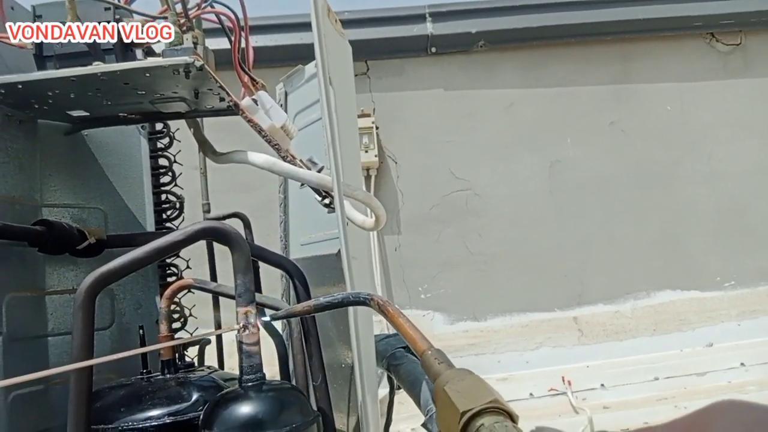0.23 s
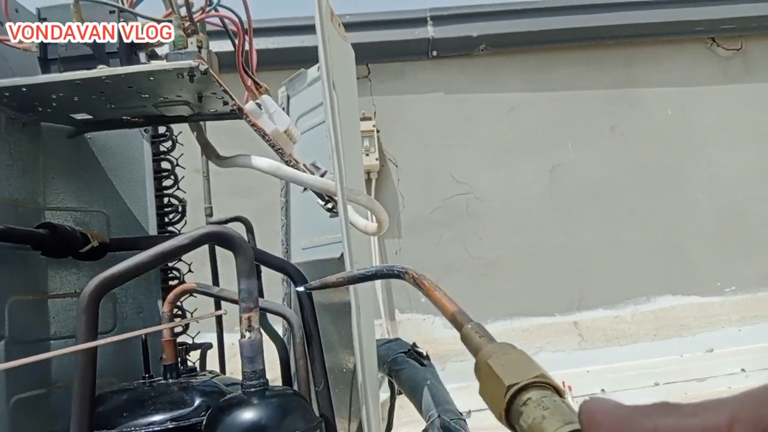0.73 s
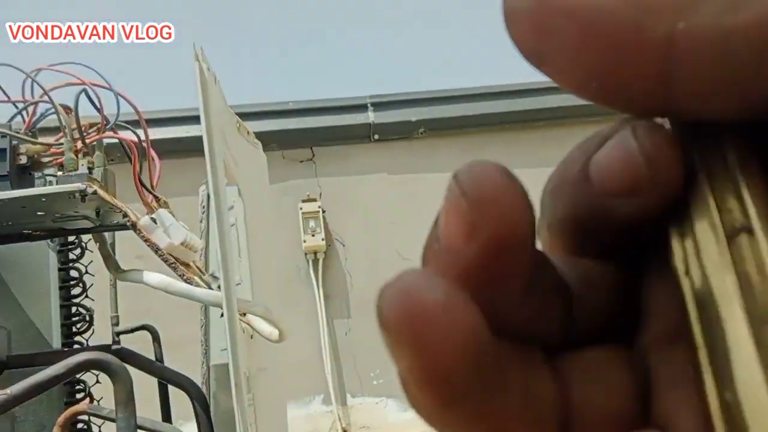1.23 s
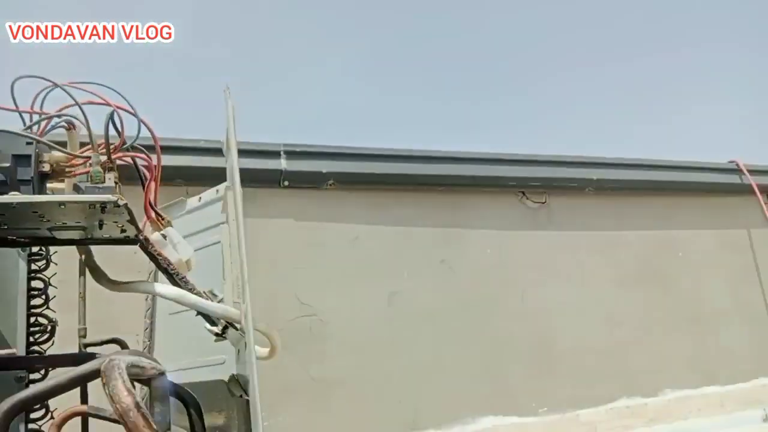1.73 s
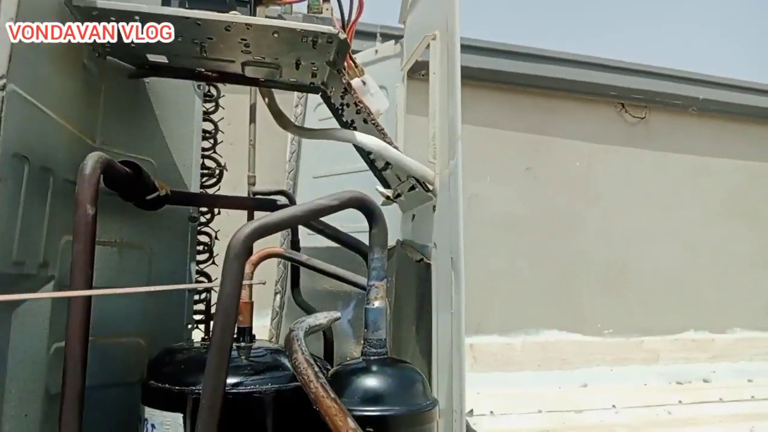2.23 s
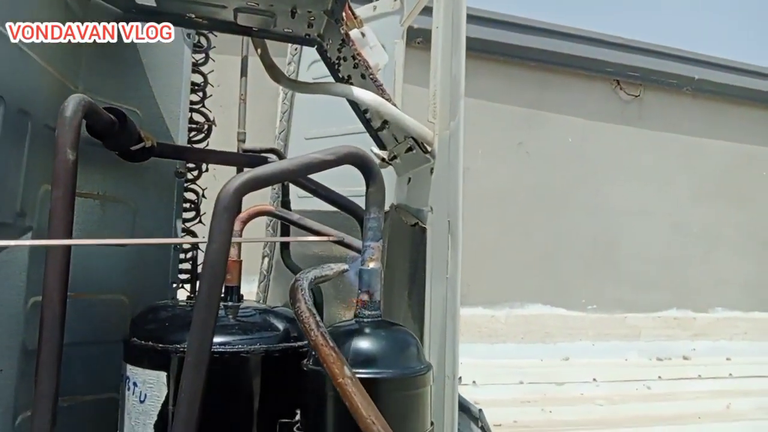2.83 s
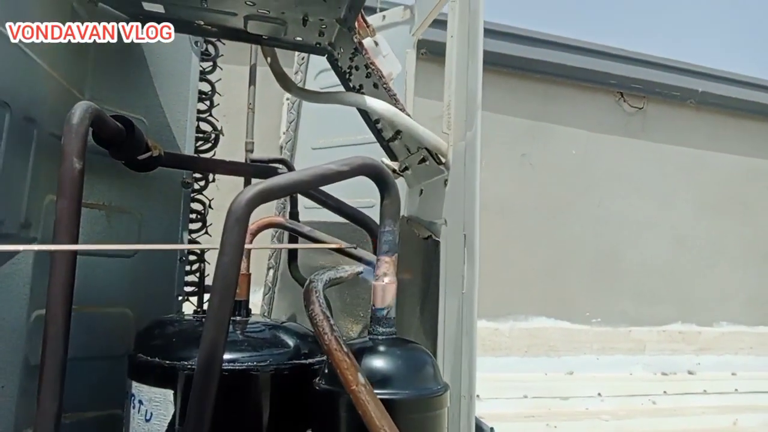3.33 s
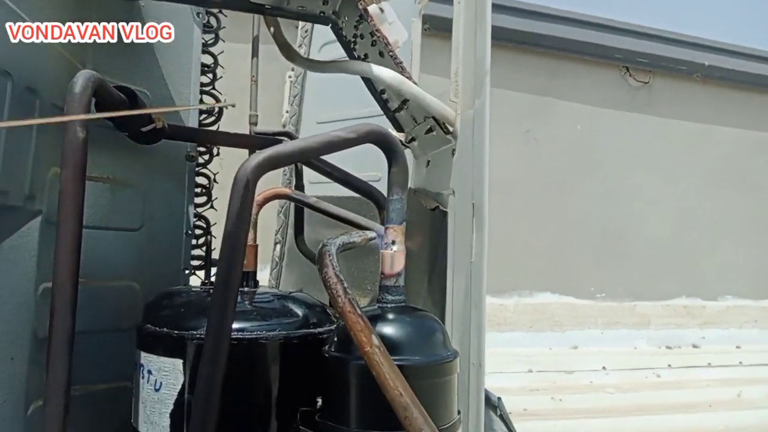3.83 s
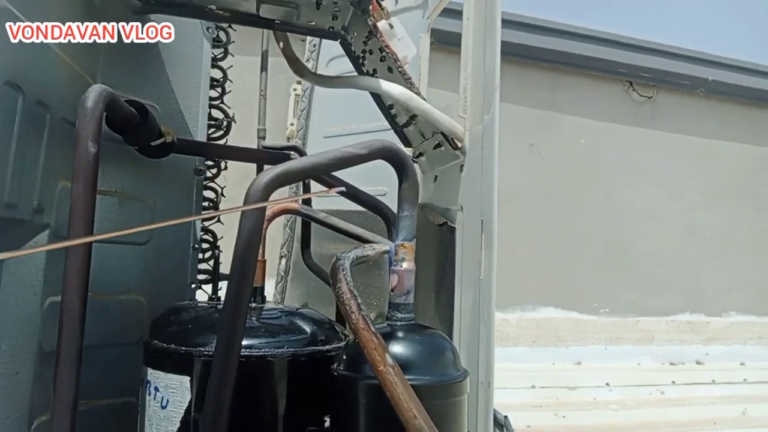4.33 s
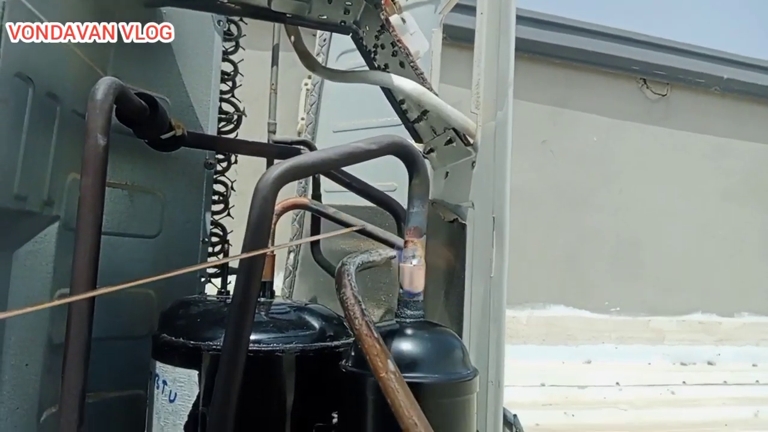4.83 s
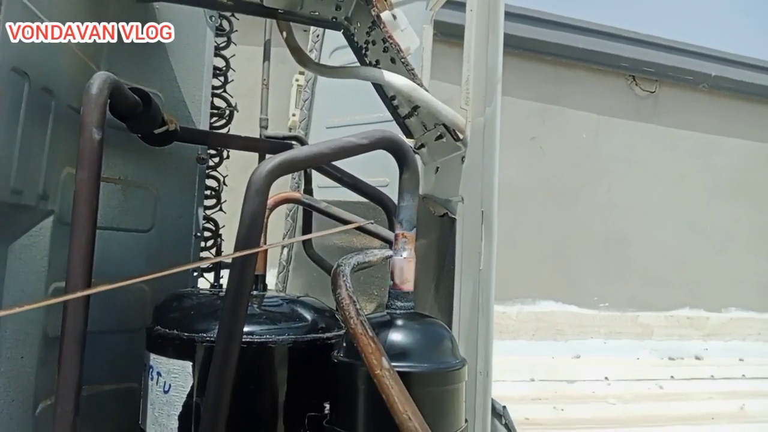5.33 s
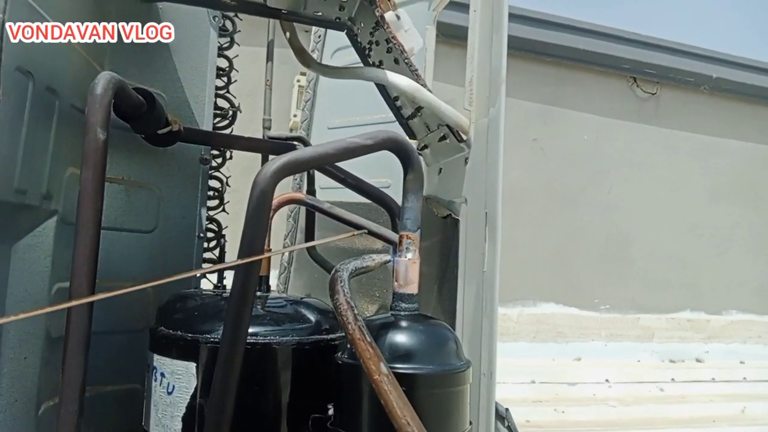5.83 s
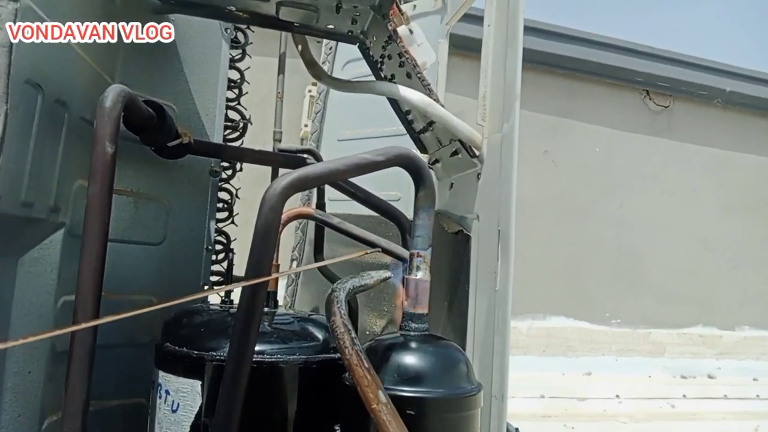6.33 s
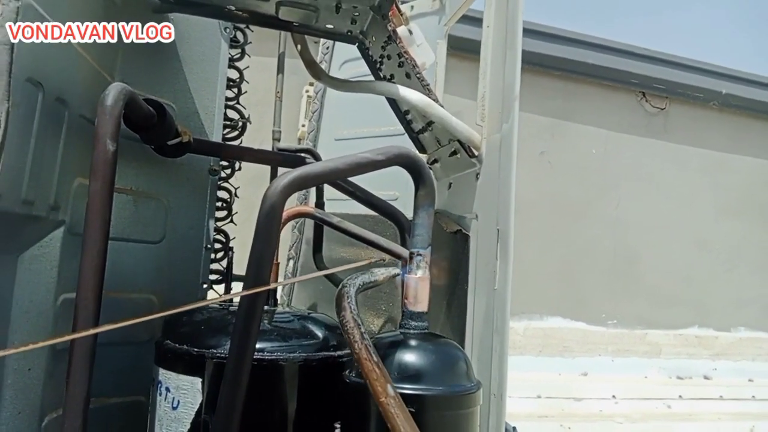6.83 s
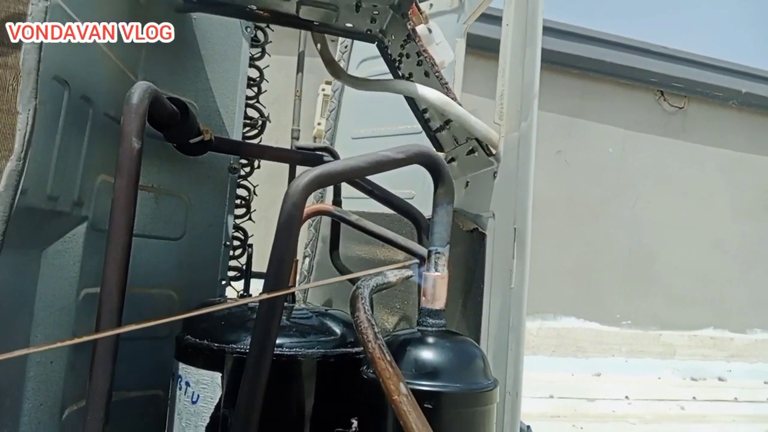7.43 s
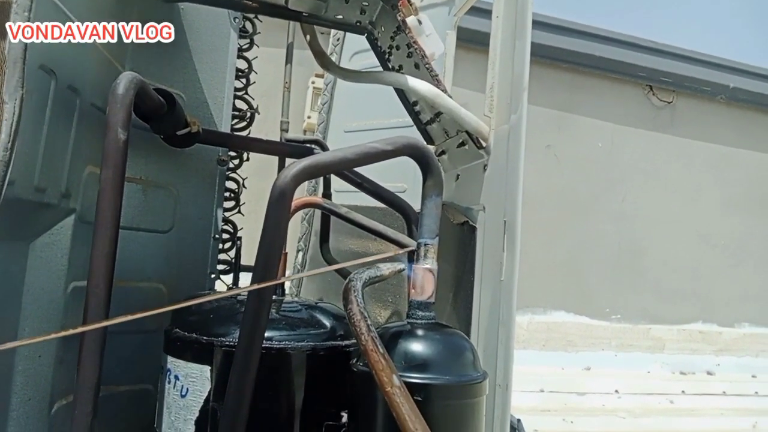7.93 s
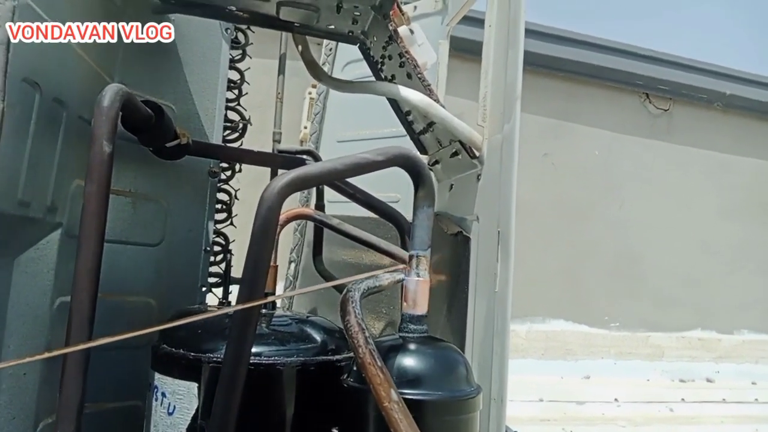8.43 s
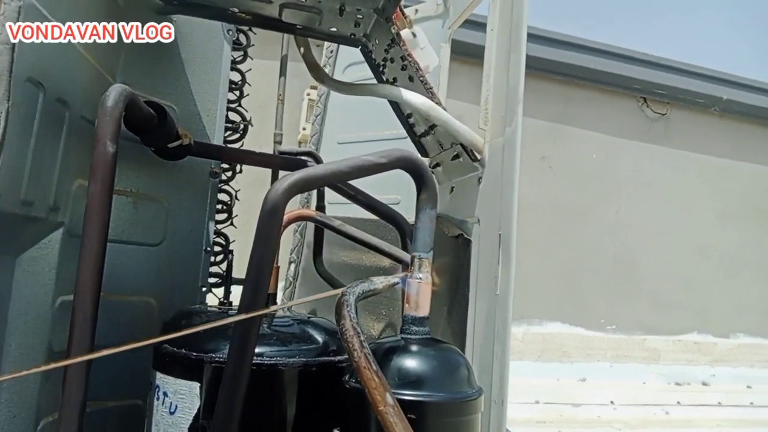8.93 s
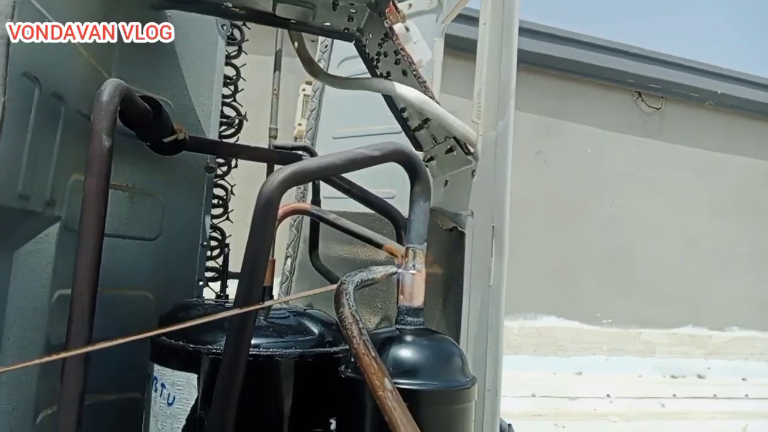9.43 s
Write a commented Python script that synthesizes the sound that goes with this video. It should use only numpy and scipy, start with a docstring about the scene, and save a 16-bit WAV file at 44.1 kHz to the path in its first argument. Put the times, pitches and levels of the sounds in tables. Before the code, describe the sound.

Outdoors, a gas torch flame rushes and sputters against a copper pipe, with heavy bursts of wind on the microphone and brief metallic clinks.

```python
"""Wind thumps break in over the low roar and thin hiss of a brazing torch on a copper joint.
Turbulence presses on two microphone ports separately, as filtered noise and short eddy pulses.
Metal contacts are cracks that excite decaying modes of torch and pipe; scrapes are stick-slip noise.
The torch is a noise jet near 10 kHz and a flame whose irregular spurts of burning modulate noise, heard
through an open cabinet's resonances or, lifted out, with a panel's echo; faint noise flickers near 15 kHz."""
import sys
import numpy as np
from scipy import signal
from scipy.fft import rfft, irfft, next_fast_len
from scipy.io import wavfile
from scipy.ndimage import map_coordinates

SR = 44100
rng = np.random.default_rng(int(sys.argv[2]) if len(sys.argv) > 2 else 0)


def wav_record(signal):
    """Record a signal, one row per channel, as 16-bit PCM in the file named by sys.argv[1]."""
    frames = np.transpose(np.atleast_2d(signal))
    bounded = np.clip(frames, -1, 1)
    # unit amplitude maps onto the largest positive 16-bit level
    quanta = np.round(bounded * 32767).astype(np.int16)
    wavfile.write(sys.argv[1], SR, quanta)


N = 427769  # length in samples

# Levels are taken before each source's own mixing gain; a positive balance favours the left.
# spectral shape of the faint flickering noise near 15 kHz: frequency_hz, density_db_per_hz
TOP_NOISE_SPECTRUM = [(9000, -31), (12000, -10), (13800, -6), (14800, -7), (15500, -5), (16000, -20)]
# light breeze between gusts: time_s, level_db
BREEZE_LEVEL = [(0, -37), (.11, -46), (.83, -38), (1.65, -44), (1.85, -58), (2.36, -43), (3.28, -49.5),
                (4.21, -45), (5.06, -39.5), (6.3, -51.5), (7.1, -36), (8.7, -37.5), (9.7, -49.5)]
# gusts, most of them stronger on one port: start_s, length_s, level_db, balance_db
GUST_EVENTS = [(0.074, 0.04, -20.5, 31), (0.22, 0.24, -20.5, 11), (0.273, 0.11, -19, -2),
               (0.846, 0.045, -18.5, 27), (0.983, 0.24, -19, 37), (1.363, 0.1, -19.5, 5),
               (1.61, 0.1, -31.5, 1), (3.567, 0.11, -24.5, 28), (3.817, 0.19, -31.5, -28),
               (4.71, 0.06, -26.5, 22), (4.848, 0.043, -21.5, 26), (5.2, 0.039, -26, 31),
               (6.777, 0.15, -27, 6), (7.029, 0.02, -19, 2), (7.364, 0.13, -22.5, 6),
               (7.615, 0.062, -23.5, 1), (8.201, 0.2, -18.5, -6), (8.624, 0.019, -23, 19),
               (8.721, 0.11, -22, 19), (9.162, 0.11, -29, 14), (9.632, 0.067, -25, 5)]
# single eddies striking a port: centre_s, level_db, balance_db, swing rate away from the core_hz
EDDY_EVENTS = [(0.105, -13.5, 26, 145), (0.887, -11, 31, 178), (1.018, -3.5, 35, 177),
               (1.03, -4.5, 31, 159), (1.2, -11.5, 25, 158), (1.297, -12.5, 27, 240), (1.405, -4, 24, 144),
               (1.438, -10, -4, 308), (4.763, -6, 32, 104), (4.882, -3.5, 25, 83.4), (7.402, -8.5, 9, 118),
               (8.061, -5.5, 32, 128), (8.176, -7.5, -24, 125), (8.223, -11, -19, 210),
               (8.242, -11.5, -21, 176), (8.274, -7, -21, 206), (8.387, -4, -31, 169),
               (8.55, -18.5, 7, 150), (8.645, -11.5, 22, 124), (8.744, -15, -17, 170),
               (8.794, -10, 24, 149)]
# spectral shape of slow turbulence: frequency_hz, density_db_per_hz
BUFFET_SPECTRUM = [(20, -47), (45, -14), (85, 0), (140, -0.5), (250, -8), (400, -18.5), (600, -37.5),
                   (1000, -55), (6000, -77)]
# spectral shape of the smaller eddies of fast air: frequency_hz, density_db_per_hz
BLUSTER_SPECTRUM = [(60, -41), (170, 4.5), (290, 4.5), (430, -4.5), (650, -13.5), (1100, -35.5),
                    (4000, -62.5)]
# metal dragged over metal: start_s, end_s, level_db, balance_db
SCRAPE_EVENTS = [(1.431, 1.438, -22, 0), (1.441, 1.487, -40, 1), (4.662, 4.762, -42.5, 2),
                 (4.725, 4.742, -38, 4)]
# metal contacts: start_s, level_db, ring of the brass torch_db, ring of the copper pipe_db
CLINK_EVENTS = [(0.327, -27, -21, -32), (1.433, -19, -1, -21), (1.468, -25, -15, -14),
                (1.947, -37, -24.5, -32), (2.191, -36.5, -30, -23), (2.49, -38.5, -30, -3),
                (2.648, -40, -30, 0), (2.764, -43, -30, 2), (3.2233, -42, -30.5, -25),
                (4.588, -28, -26, -4), (4.818, -29.5, -20, 1.5)]
# ringing modes of the brass torch: pitch_hz, level_db, t60_s
BRASS_MODES = [(3811, -18, .25), (6982, -17, .11), (7865, 0, .14), (11070, -10, .25), (11110, -12, .25),
               (13740, -8, .16)]
# ringing modes of the copper pipe: pitch_hz, level_db, t60_s
COPPER_MODES = [(5728, -16, .08), (8915, -8, .14), (9280, -6, .07), (9650, 0, .085), (10020, -6, .07),
                (11050, -8, .05)]
# spectral shape of rubbing and cracking metal: frequency_hz, density_db_per_hz
GRIT_SPECTRUM = [(2000, 1), (5000, -7.5), (8000, 0.5), (10500, 9.5), (12500, 1), (16000, -3)]
# gas leaving the nozzle: time_s, hiss_level_db, balance_db
JET_LEVEL = [(0.0, -56.5, 1), (1.35, -57.5, 4), (1.6, -65.5, 0), (2.7, -65, 8), (3.6, -67, 7),
             (5.25, -61.5, 6), (5.6, -62.5, -1), (6.7, -56, 8), (7.4, -59.5, 5), (9.7, -58, 10)]
# filter of the nozzle hiss: frequency_hz, gain_db
HISS_SPECTRUM = [(2000, -35), (6000, -43), (9000, 5), (9550, -1), (9750, 15), (10100, 20), (10800, 18),
                 (11200, 0), (11480, 13), (11800, -14), (12300, -6), (13000, -12), (15500, 4)]
# flame as the torch moves about the joint: time_s, roar_level_db, level of its tearing edge_db
FLAME_LEVEL = [(0, -50, -57.5), (.65, -50, -64), (1.02, -38.5, -60.5), (1.58, -45.5, -66),
               (2.4, -46, -61.5), (2.86, -44.5, -55), (3.17, -51, -62), (3.3, -47, -65.5), (3.58, -50, -65),
               (3.95, -47, -59), (4.68, -46.5, -60), (4.92, -48, -63.5), (5.36, -50.5, -64),
               (5.7, -47, -64), (7.5, -47, -63), (7.95, -44.5, -58.5), (8.3, -49, -60.5), (9.7, -46, -63)]
# flare-ups, where the flame meets the pipe squarely and splits: start_s, end_s, rise of the tearing_db
FLARE_EVENTS = [(1.584, 1.613, 11), (2.392, 2.576, 2.5), (2.876, 3.215, 6), (4.034, 4.134, 5),
                (4.228, 4.574, 6.5), (5.392, 5.628, 3.5), (6.193, 6.463, 7.5), (6.38, 6.445, 5),
                (6.69, 7.01, 7.5), (7.528, 7.889, 6.5), (7.691, 7.745, 9), (9.57, 9.692, 7.5)]
# sharp sputters of the flame: centre_s, level_db
SPUTTER_EVENTS = [(0.796, -42), (1.054, -51), (2.09, -47), (3.121, -47), (3.16, -50), (3.668, -53),
                  (5.137, -46.5), (5.502, -42.5), (5.598, -51), (5.839, -45), (6.119, -48.5),
                  (6.417, -42.5), (6.554, -47), (6.821, -52), (6.932, -43.5), (7.175, -48.5), (7.62, -40.5),
                  (7.663, -48), (7.793, -39.5), (8.186, -45.5), (8.269, -45), (8.55, -50), (8.599, -47),
                  (9.047, -40.5), (9.313, -43), (9.405, -46.5), (9.6, -48.5)]
# torch lifted out of the cabinet: time_s, share of its power through open air (1 at most is used)
LIFT_SHARE = [(0, 0.4), (.75, 0.67), (1.05, 1.38), (1.7, 0.71), (2.0, 0.57), (2.4, 0.4)]
# panel echo, shifting as the torch moves round the pipe: time_s, delay_ms
PANEL_DELAY = [(0, 1.47), (.8, 1.64), (1.3, 1.21), (1.7, 1.39), (2.1, 1.2), (2.9, 1.01), (3.5, 1.03),
               (9.7, 1.18)]
# spectral shape of the roar inside the cabinet: frequency_hz, density_db_per_hz
ROAR_SPECTRUM = [(30, -23), (80, -8), (170, 2), (350, 3.5), (520, 2), (700, -7.5), (1000, -12),
                 (1300, -34.5), (1900, -37.5), (2400, -29.5), (4000, -49.5), (9000, -85)]
# spectral shape of the roar through open air: frequency_hz, density_db_per_hz
OPEN_AIR_SPECTRUM = [(40, -26), (150, -2), (400, 10), (700, -9.5), (1100, -13.5), (1800, -19), (2300, -30),
                     (4000, -34.5), (9000, -41.5)]
# spectral shape of the flame tearing on the pipe: frequency_hz, density_db_per_hz
TEARING_SPECTRUM = [(400, -33.5), (1200, 15), (1900, 4.5), (2400, 7), (3500, 3.5), (4800, -0.5), (6200, -4),
                    (8200, -1), (12000, -5), (16000, -31)]
# cabinet resonances and dips at the left port, before they shift: centre_hz, width_hz, gain_db
LEFT_RESONANCES = [(1364, 107, -58), (1790, 73, 12), (2350, 140, -24), (3500, 490, 8.5)]
# cabinet resonances and dips at the right port, before they shift: centre_hz, width_hz, gain_db
RIGHT_RESONANCES = [(1050, 89, 6), (1646, 104, -38), (1913, 130, 13.5), (3250, 140, -17.5),
                    (3900, 370, 3.5)]
# likeness of torch sound at the two ports: frequency_hz, coherence_0_to_1
PORT_COHERENCE = [(100, 1), (300, 1), (700, 0.82), (1400, 0.49), (3000, 0), (6000, 0)]

# the breeze wanders at each port on its own: depth, random knots a second, left-right lean
WANDER_DB, WANDER_RATE_HZ, LEAN_DB = 2, 7.9, 1.5
# every gust builds quickly, sags while it lasts, and dies away exponentially
GUST_ATTACK_S, GUST_SAG_DB_PER_S, GUST_RELEASE_S = 0.019, 12.5, 0.046
SCRAPE_EDGE_S = 0.0057
# the hand stops the torch's ring: free ringing, then the extra decay
GRIP_S, GRIP_T60_S = 0.048, 0.035
HISS_CLIMB_PER_S = 0.0013  # rise of the hiss's pitch as a share of itself
# a flare-up builds over a share of its length; the roar swells by a share of its dB
FLARE_BUILD_SHARE, FLARE_COLLAPSE_S, ROAR_SHARE = 0.44, 0.011, 0.42
LEFT_EARLY_S = 4e-5
TOP_HZ = 16000


def amp(db):
    """The decibel law: amplitude gain of a level in dB."""
    return 10 ** (np.asarray(db) / 20)


def unit(x):
    """Normalisation of mean power: x at rms 1."""
    return x / np.sqrt(np.mean(x ** 2) + 1e-20)


def along(points, hz):
    """Logarithmic frequency scale: (hz, value) points interpolated at hz."""
    f, v = np.transpose(points)
    return np.interp(np.log(hz + 1), np.log(f + 1), v)


def curves(rows):
    """Linear interpolation in time: one value per sample for each column after the time."""
    times, *columns = np.transpose(rows)
    return [np.interp(np.arange(N) / SR, times, column) for column in columns]


def wobble(rate):
    """Band-limited random fluctuation: a smooth curve with rate knots a second."""
    knots = rng.standard_normal(int(N * rate / SR) + 4)
    return map_coordinates(knots, [np.arange(N) * rate / SR])


def filtered(x, response):
    """Linear filtering: the spectrum of x times a response of frequency."""
    m = next_fast_len(N + SR // 2)  # zero padding against wrap-round
    return irfft(rfft(x, m) * response(np.fft.rfftfreq(m, 1 / SR)), m)[..., :N]


def coloured(x, spectrum):
    """Minimum-phase filtering: x through a causal filter of the given spectral shape, at rms 1."""
    log_gain = np.log(amp(along(spectrum, np.fft.rfftfreq(8192, 1 / SR))))
    cepstrum = irfft(log_gain)
    # folding the cepstrum onto positive times makes the filter causal
    cepstrum[1:4096] *= 2
    cepstrum[4097:] = 0
    impulse = irfft(np.exp(rfft(cepstrum)))
    return unit(signal.fftconvolve(x, impulse[None], axes=1)[:, :N])


def swept(x, gain_db, scale):
    """Scaled resonance: a filter whose frequencies are all multiplied by the curve scale."""
    hz, t, z = signal.stft(x, SR, nperseg=1024)
    moved = hz[:, None] / np.interp(t, np.arange(N) / SR, scale)
    return signal.istft(z * amp(gain_db(moved)), SR)[1][:, :N]


def shifting(x, depth_db, width_hz, rate):
    """Drifting interference: peaks and dips wander as the torch moves between the cabinet's walls."""
    hz, t, z = signal.stft(x, SR, nperseg=1024)
    places = np.meshgrid(hz / width_hz, t * rate, indexing="ij")
    field = map_coordinates(rng.standard_normal((256, 128)), places, mode="wrap")
    depth = depth_db * np.clip(hz / 1500, 0, 1)[:, None]  # shallower in the bass
    return signal.istft(z * amp(depth * field), SR, nperseg=1024)[1][:, :N]


def panned(balance_db):
    """Power-preserving balance: left and right gains of constant total power."""
    gains = amp(np.array([balance_db, -balance_db]) / 2).reshape(2, -1)
    return gains / np.sqrt(np.mean(gains ** 2, axis=0))


def ports(pair):
    """Spatial coherence: unrelated signals become two ports, alike in the bass, the left a little early."""
    def turn(hz):
        return np.arccos(np.clip(along(PORT_COHERENCE, hz), -1, 1)) / 2

    def advance(hz):
        return np.exp(1j * np.pi * hz * LEFT_EARLY_S * np.array([[1], [-1]]))

    mid, side = filtered(pair, lambda hz: np.array([np.cos(turn(hz)), np.sin(turn(hz))]))
    return filtered(np.array([mid + side, mid - side]), advance)


def add(track, s, sound):
    """Superposition: mix a short sound into the track at time s."""
    part = track[:, max(round(s * SR), 0):][:, :sound.shape[1]]
    part += sound[:, :part.shape[1]]


def spurts(rate, length, scatter_db):
    """Irregular pulse train: brief bursts of power at uneven gaps and of uneven size, mean power 1."""
    gaps = rng.gamma(1.3, 1 / (1.3 * rate), 2000)
    starts = (np.cumsum(gaps) * SR).astype(int)
    sizes = amp(scatter_db * np.clip(rng.standard_normal(len(starts)), -2, 1.3))
    pulses = np.bincount(starts, sizes ** 2, N)[:N]
    power = np.abs(signal.fftconvolve(pulses, np.hanning(int(length * SR)) ** 2)[:N])
    return power / power.mean()


def top_noise(level_db, balance_db):
    """Intermittent noise: a faint band near 15 kHz that flickers in short, uneven bursts."""
    flicker = np.sqrt(.5 + spurts(rate=28, length=.016, scatter_db=6))
    noise = coloured(flicker * rng.standard_normal((2, N)), TOP_NOISE_SPECTRUM)
    return amp(level_db) * noise * panned(balance_db)


def airflow(breeze_db):
    """Addition of powers: gusts on top of a wandering breeze give the strength of air on each port."""
    wander = WANDER_DB * np.array([wobble(WANDER_RATE_HZ), wobble(WANDER_RATE_HZ)])
    power = (amp(curves(BREEZE_LEVEL)[0] + breeze_db + wander) * panned(LEAN_DB)) ** 2
    age = np.arange(SR) / SR
    for s, length, db, balance_db in GUST_EVENTS:
        attack = np.minimum(age / GUST_ATTACK_S, 1)
        release = np.exp(-np.maximum(age - length, 0) / GUST_RELEASE_S)
        sag = amp(db - GUST_SAG_DB_PER_S * age)
        add(power, s, (sag * attack * release * panned(balance_db)) ** 2)
    return np.sqrt(power)


def wind():
    """Turbulent pressure: lumpy noise on each port; faster air makes smaller, higher eddies."""
    force = airflow(breeze_db=6.5)
    lumps = amp(7.2 * np.tanh([wobble(35), wobble(35)]))
    rumble = coloured(lumps * rng.standard_normal((2, N)), BUFFET_SPECTRUM)
    bluster = coloured(lumps * rng.standard_normal((2, N)), BLUSTER_SPECTRUM)
    # bluster grows more steeply than the rumble
    churn = amp(-4.0) * (force / amp(-19.0)) ** 1.65 * bluster
    return force * (rumble + churn)


def eddies(life):
    """Vortex passage: one thump, of life seconds in scale, whose swings are quickest at its core."""
    out, t = np.zeros((2, N)), np.arange(-SR // 25, SR // 25) / SR
    for s, db, balance_db, hz in EDDY_EVENTS:
        swings = hz * (t + 0.74 * life * np.tanh(t / life))
        thump = np.cos(2 * np.pi * swings + rng.standard_normal()) / np.cosh(t / life)
        add(out, s + t[0], amp(db) * panned(balance_db) * thump)
    return out


def scrape():
    """Stick-slip friction: metal catches and slips on metal in a ragged run of tiny cracks."""
    t = np.arange(N) / SR
    pressure = np.zeros((2, N))
    for start, end, db, balance_db in SCRAPE_EVENTS:
        contact = (np.tanh((t - start) / SCRAPE_EDGE_S) - np.tanh((t - end) / SCRAPE_EDGE_S)) / 2
        pressure += amp(db) * panned(balance_db) * contact
    slips = np.sqrt(.45 + spurts(rate=220, length=.003, scatter_db=4))
    return pressure * coloured(slips * rng.standard_normal((2, N)), GRIT_SPECTRUM)


def clinks(crack_t60, ring_db):
    """Modal excitation: a bright crack sets torch or pipe ringing; the torch body also clacks."""
    out, t = np.zeros((2, N)), np.arange(SR // 6) / SR
    grit = coloured(rng.standard_normal((2, N)), GRIT_SPECTRUM)
    clack = coloured(ports(rng.standard_normal((2, N))), TEARING_SPECTRUM)
    grip_db = -60 * np.maximum(t - GRIP_S, 0) / GRIP_T60_S
    for s, db, brass_db, copper_db in CLINK_EVENTS:
        now = round(s * SR) + np.arange(len(t))
        sound = amp(-1.5 - 60 * t / crack_t60) * grit[:, now]
        sound += amp(brass_db - 14.5 - 60 * t / 0.19) * clack[:, now]
        for modes, share_db in ((BRASS_MODES, brass_db + grip_db), (COPPER_MODES, copper_db)):
            for hz, level, t60 in modes:
                # chatter at the contact roughens the start of the ring
                chatter = (.012 + .07 * np.exp(-t / .008)) * rng.standard_normal(len(t))
                # the right port's phase leads by one radian
                phase = 2 * np.pi * (hz * t + rng.random()) + np.cumsum(chatter) + np.array([[0], [1]])
                decay_db = ring_db + share_db + level + rng.normal(0, 1) - 60 * t / t60
                sound += amp(decay_db) * np.sin(phase)
        add(out, s, amp(db) * sound * (1 - np.exp(-t / 0.0022)))
    return out


def jet():
    """Jet noise: gas hisses near 10 kHz in narrow strands that drift, waver and slowly climb."""
    hiss_db, balance_db = curves(JET_LEVEL)
    pitch = 1 + HISS_CLIMB_PER_S * (np.arange(N) - N / 2) / SR + 0.0064 * wobble(6)
    hiss = swept(rng.standard_normal((2, N)), lambda hz: along(HISS_SPECTRUM, hz), pitch)
    hiss = shifting(unit(hiss), depth_db=2.4, width_hz=150, rate=3)
    return amp(hiss_db + 3.0 + 2.05 * wobble(25)) * hiss * panned(balance_db)


def panel(x, reflection):
    """Comb filtering: the steel panel returns the sound about a millisecond late."""
    late = np.arange(N) - curves(PANEL_DELAY)[0] * SR / 1000
    echo = np.array([np.interp(late, np.arange(N), side) for side in x])
    return unit(x + reflection * echo)


def resonant(pair):
    """Cavity resonance: each port has its own pattern, which rises as the torch nears the panel."""
    def bumps(hz, modes):
        return sum(db * np.exp(-((hz - c) / w) ** 2) for c, w, db in modes)

    scale = (1.118 / curves(PANEL_DELAY)[0]) ** 0.23  # a shorter echo means a nearer panel
    return swept(pair, lambda hz: np.array([bumps(hz, LEFT_RESONANCES), bumps(hz, RIGHT_RESONANCES)]), scale)


def sputters(rise, decay):
    """Transient envelope: each sharp spurt bursts out and flutters away within milliseconds."""
    out, t = np.zeros((1, N)), np.arange(-SR // 25, SR // 25) / SR
    for s, db in SPUTTER_EVENTS:
        add(out, s + t[0], amp(db) * 2 / (np.exp(-t / rise) + np.exp(t / decay))[None])
    return out * amp(2 * wobble(250))


def flare_ups():
    """Slow build and quick collapse: rise in dB as the flame splits on the pipe."""
    t = np.arange(N) / SR
    rise_db = np.zeros(N)
    for start, end, db in FLARE_EVENTS:
        full = start + FLARE_BUILD_SHARE * (end - start)
        rise_db += db * np.interp(t, [start, full, end, end + FLARE_COLLAPSE_S], [0, 1, 1, 0])
    return rise_db


def flame():
    """Combustion noise: igniting gas pockets drive the low roar and, more steeply, the bright tearing."""
    roar_db, tearing_db = curves(FLAME_LEVEL)
    flare_db = flare_ups() + 1.3 * wobble(14)
    roar_db = roar_db + ROAR_SHARE * flare_db
    tearing_db = tearing_db + flare_db
    lift = np.clip(curves(LIFT_SHARE)[0], 0, 1)
    power = spurts(rate=125, length=.0075, scatter_db=4.5)
    bunches = amp(5 * np.tanh(1.2 * wobble(24))) ** 1.4
    power = power * bunches / np.mean(bunches)
    # held hard against the pipe, the spurts merge into an even rush
    merged = np.clip(.34 + .04 * (tearing_db + 59), .2, .68)
    ragged = np.sqrt(merged + (1 - merged) * power)
    burn = np.sqrt(.55 + .45 * power)

    def gas(strength, spectrum):
        return coloured(ports(strength * rng.standard_normal((2, N))), spectrum)

    inside = amp(roar_db + 12.5) * np.sqrt(1 - lift) * gas(burn, ROAR_SPECTRUM) * panned(1.0)
    open_roar = panel(gas(burn, OPEN_AIR_SPECTRUM), reflection=0.26)
    outside = amp(roar_db + 10.5) * np.sqrt(lift) * open_roar
    # a sputter is a sharp tear with a low puff under it
    sharp = sputters(rise=0.0013, decay=0.0038)
    tearing = (amp(tearing_db + 4.0) * ragged + amp(-2.5) * sharp) * gas(1, TEARING_SPECTRUM)
    puffs = amp(14.0) * sharp * gas(1, ROAR_SPECTRUM)
    enclosed = resonant(inside + tearing + puffs)
    return shifting(enclosed, depth_db=2, width_hz=230, rate=1.5) + outside


def scene():
    """Superposition of faint top noise, wind on the ports, metal contacts and the torch."""
    background = top_noise(level_db=-73.0, balance_db=4)
    air = wind() + eddies(life=0.0014)
    metal = scrape() + clinks(crack_t60=0.042, ring_db=-3.0)
    torch = jet() + flame()
    return background + air + metal + torch


def record(dry):
    """Soft saturation and band limiting: the strongest peaks are rounded and the extreme treble removed."""
    rounded = dry / (1 + (dry / .92) ** 4) ** (1 / 4)
    return filtered(rounded, lambda hz: hz < TOP_HZ)


dry = scene()
out = record(dry)
wav_record(out)
```